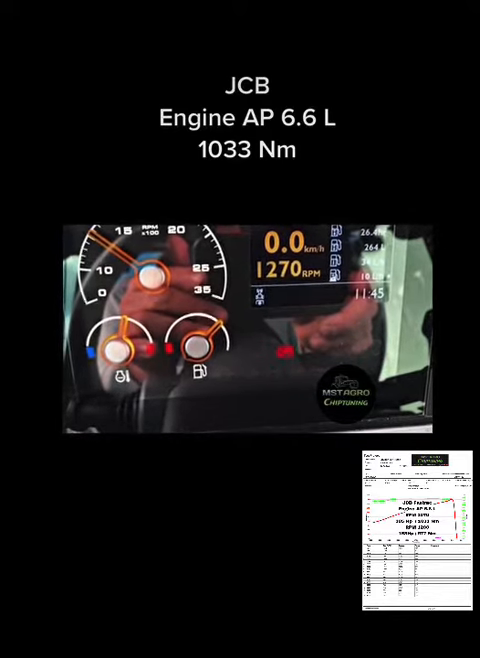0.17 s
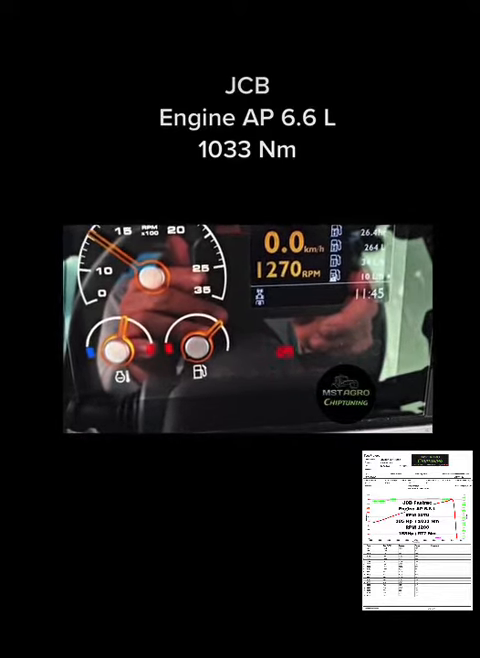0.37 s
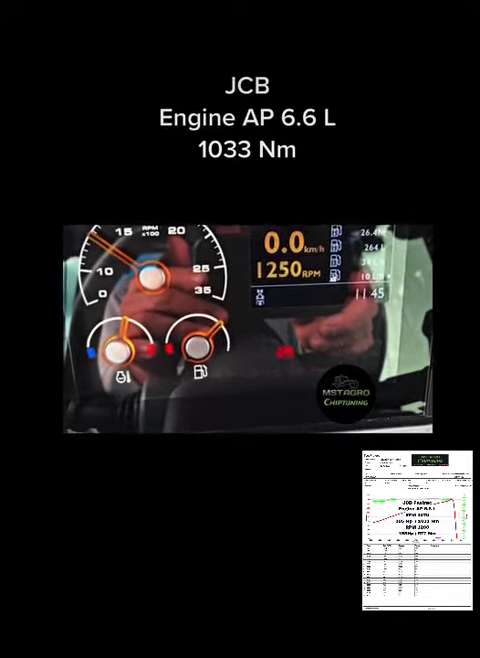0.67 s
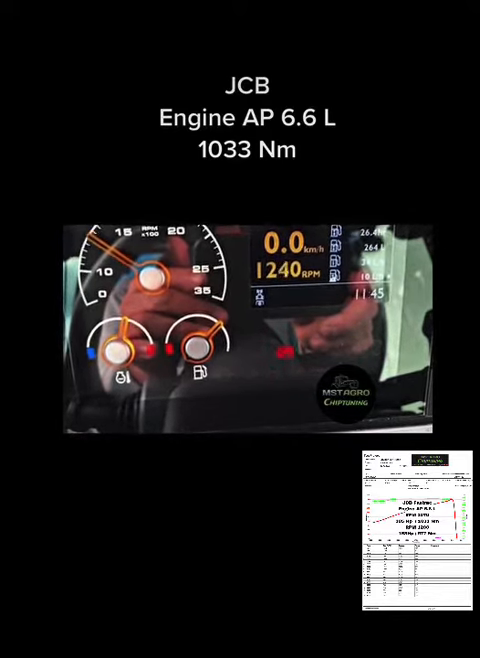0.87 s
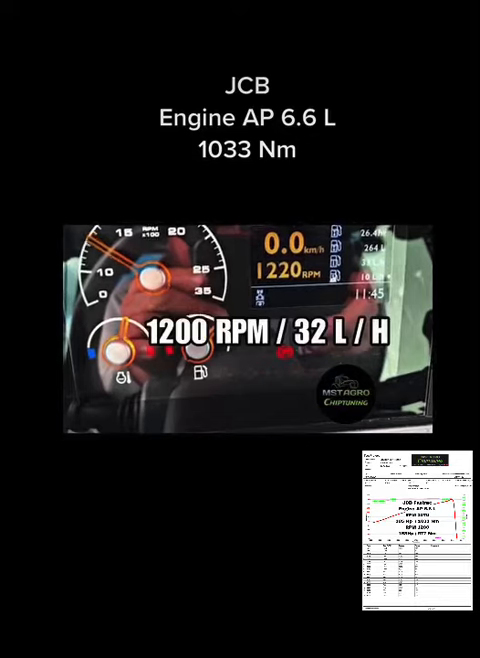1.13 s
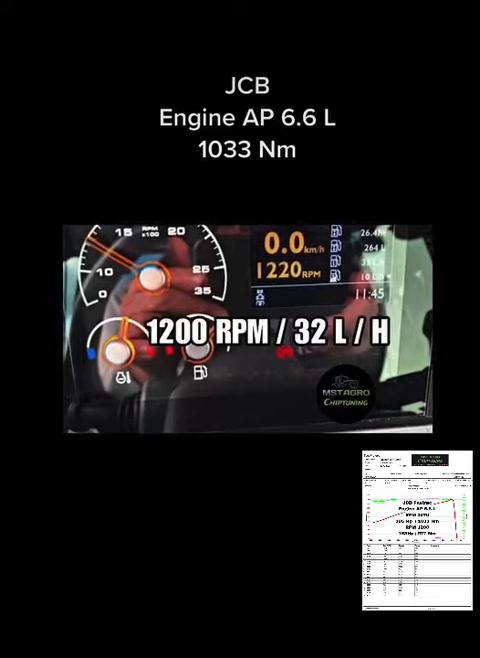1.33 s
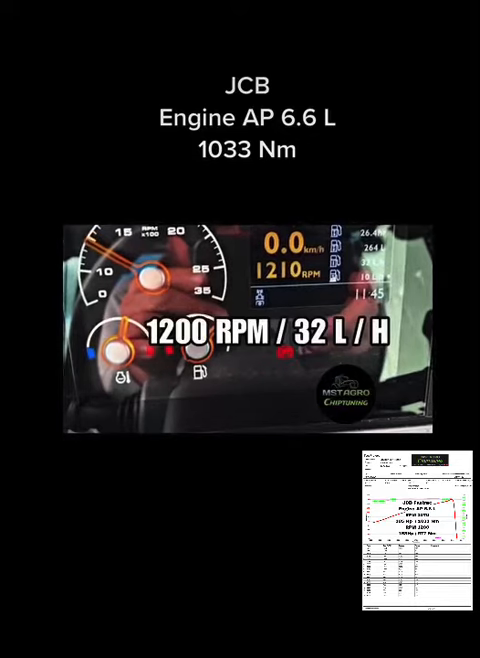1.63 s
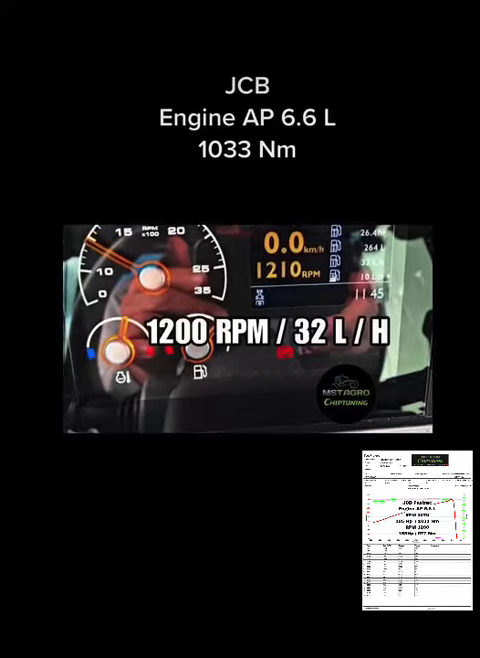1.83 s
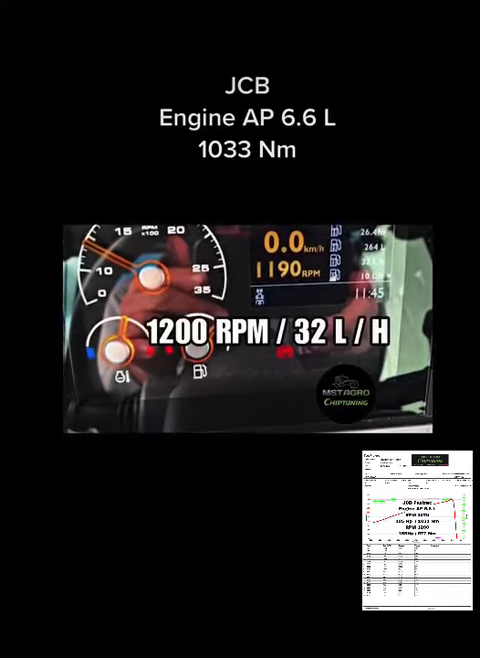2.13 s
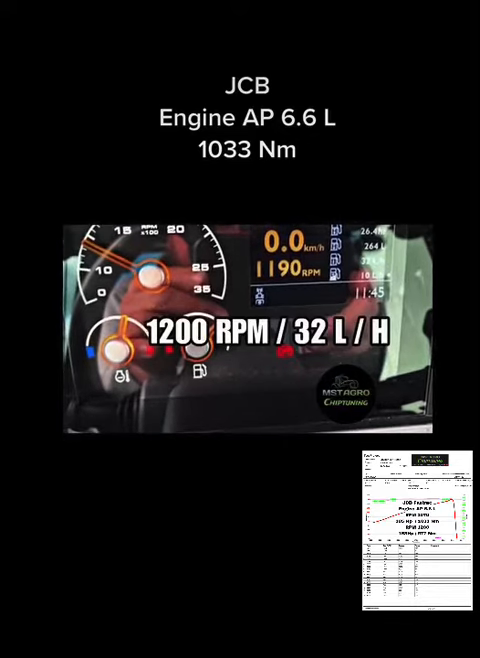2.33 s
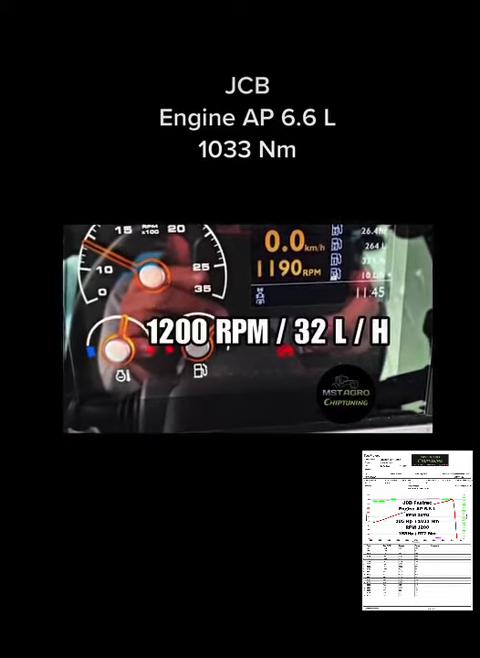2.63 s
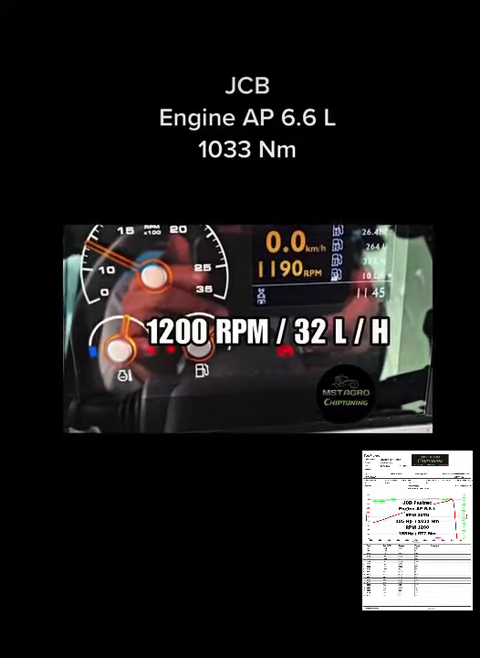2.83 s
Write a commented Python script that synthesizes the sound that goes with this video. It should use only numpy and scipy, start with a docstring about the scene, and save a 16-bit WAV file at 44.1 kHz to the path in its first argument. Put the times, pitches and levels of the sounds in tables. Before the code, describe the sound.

Diesel tractor engine droning under load inside the cab, sagging slightly in pitch, then recovering

```python
"""Inside a tractor cab: a load pulls the six-cylinder diesel down, and it recovers at the end. The firing drone
and its orders are sines lifted by cab resonances; a gear pair whines on the same cycle. The cab cavity booms,
filtered noise makes rumble and rushing air, and loose parts rattle in noise bursts. The turbocharger whistles
very high in a thin noise band, and a part rings at the end. Two close microphone ports, alike to a degree that
varies with frequency, pick it up. The top treble is full of gaps: thin strips of hiss come and go."""
import sys
import numpy as np
from scipy import signal
from scipy.fft import rfft, irfft
from scipy.io import wavfile

SR = 44100
rng = np.random.default_rng(int(sys.argv[2]) if len(sys.argv) > 2 else 0)


def file_out(sig):
    """Save sig as 16-bit WAV at sys.argv[1]."""
    # one column per channel
    cols = np.atleast_2d(sig).T
    # limit, then scale
    lim = np.clip(cols, -1, 1)
    pcm = np.round(lim * 32767).astype(np.int16)
    wavfile.write(sys.argv[1], SR, pcm)


def field_ratio(decibels):
    """Amplitude ratio for a level in dB (20 dB per decade); scalars and array-likes work."""
    return 10 ** (np.asarray(decibels, dtype=float) / 20)


N = 132300
HZ = np.maximum(np.fft.rfftfreq(N, 1 / SR), 1)
SIDE = np.array([[.5], [-.5]])   # splits a left-right difference over the left and right port
CYLINDERS = 6   # firings per four-stroke cycle


def rms_one(x):
    """Scales a signal to an rms of 1."""
    return x / np.sqrt(np.mean(x ** 2) + 1e-20)


def in_time(rows):
    """Draws each column of a table as a curve over the scene."""
    seconds, *columns = np.transpose(rows)
    return [np.interp(np.arange(N) / SR, seconds, column) for column in columns]


def at_hz(points, hz):
    """Reads a table along a logarithmic frequency axis."""
    table_hz, values = np.array(points)[:, 0], np.array(points)[:, 1]
    return np.interp(np.log(hz), np.log(np.maximum(table_hz, 1)), values)


def drift(rate_hz):
    """Slow chance with spread 1: white noise through two equal low-pass poles, run at every 40th sample."""
    r = np.exp(-80 * np.pi * rate_hz / SR)
    white = rng.standard_normal(N // 40 + 2002)
    slow = signal.lfilter([1], [1, -2 * r, r * r], white)[2000:]
    return np.interp(np.arange(N) / 40, np.arange(len(slow)), rms_one(slow - slow.mean()))


def resonance(x, hz, width_hz):
    """A two-pole resonator: one damped mode of a cavity or a part."""
    r = np.exp(-np.pi * width_hz / SR)
    poles = [1, -2 * r * np.cos(2 * np.pi * hz / SR), r * r]
    return signal.lfilter([(1 - r * r) / 2, 0, (r * r - 1) / 2], poles, x)


# share of noise power common to both microphone ports: (frequency [Hz], likeness [0-1])
PORT_LIKENESS = [(150, .93), (300, .75), (600, .55), (2000, .45), (4000, .5), (6000, .8), (11000, .85)]
# phase by which the left port leads in the shared noise: (frequency [Hz], lead [rad])
PORT_LEAD = [(0, 0.3), (600, 1.26), (1120, 2.33), (1810, 3.03), (3360, 10.27), (5860, 19.15), (8000, 19)]
# level of the left port over the right: (frequency [Hz], level difference [dB])
PORT_BALANCE = [(60, -4), (150, -0.5), (380, 3.5), (950, 1.5), (2380, 0.5), (5980, -0.5), (15000, -7.5)]


def port_noise():
    """Spectrum of white noise at both ports: a shared part with lead, a part of each port's own, and balance."""
    shared, left, right = rfft(rng.standard_normal((3, N)))
    alike = np.clip(at_hz(PORT_LIKENESS, HZ), 0, 1)
    lead = np.interp(HZ, *np.transpose(PORT_LEAD))
    common = np.sqrt(alike) * shared * np.exp(1j * SIDE * lead)
    own = np.sqrt(1 - alike) * np.array([left, right])
    hiss_band = HZ < 11150   # top of the steady hiss, Hz
    return (common + own) * field_ratio(SIDE * at_hz(PORT_BALANCE, HZ)) * hiss_band


def coloured(spectrum, patchy_db):
    """Noise of a given colour; every half octave flickers partly with the others, mostly alone."""
    noise = port_noise() * field_ratio(at_hz(spectrum, HZ))
    together, out = drift(3.4), 0
    top = max(db for _, db in spectrum)
    for centre in np.arange(4.5, 14.5, .5):   # octaves above 1 Hz
        if at_hz(spectrum, 2 ** centre) > top - 50:
            window = np.cos(np.pi * np.clip(np.log2(HZ) - centre, -.5, .5)) ** 2
            flicker_db = patchy_db * (0.12 * together + drift(38.0))
            out = out + field_ratio(flicker_db) * irfft(noise * window, N)
    return rms_one(out)


def narrow_noise(hz, width_hz, lead):
    """A narrow band of noise carried on a pitch, with its phase leading at the left port by lead [rad]."""
    low_pass = signal.butter(4, width_hz / 2, fs=SR, output="sos")
    a, b = signal.sosfilt(low_pass, rng.standard_normal((2, N)))
    phase = 2 * np.pi * np.cumsum(hz * np.ones(N)) / SR + lead * SIDE
    return rms_one(a * np.cos(phase) + b * np.sin(phase))


DRONE_WAVER_DB, WAVER_RATE_HZ = .35, 9.0
DRONE_PAN_DB_PER_HZ = -0.6   # left over right, per Hz of firing tone above its mean
PHASE_WANDER_RAD, PHASE_LEAD_RAD = .7, 1.2   # all tones but the firing tone
# cab panel resonances that lift tones passing through: (frequency [Hz], width [Hz], lift [dB])
CAB_RESONANCES = [(125, 12, 9), (244.5, 11, 16), (293, 20.4, 6.5), (1925, 110, 10), (2480, 70, 10)]


def tones(table, cycle_hz, waver_db, wander_hz=1.5):
    """Sines on whole multiples of the engine cycle, each wavering and lifted near a cab resonance."""
    turn, out = 2 * np.pi * np.cumsum(cycle_hz) / SR, np.zeros((2, N))
    for multiple, db, pan_db, lead in table:
        multiple = round(multiple)
        tone_hz = multiple * cycle_hz
        lift = sum(lift_db / (1 + (2 * (tone_hz - hz) / width) ** 4) for hz, width, lift_db in CAB_RESONANCES)
        waver = (DRONE_WAVER_DB if multiple == CYLINDERS else waver_db) * drift(WAVER_RATE_HZ)
        # the octave keeps near a set phase offset from the firing tone, other tones start anywhere
        free_start = multiple not in (CYLINDERS, 2 * CYLINDERS)
        phase = multiple * turn + rng.uniform(0, 2 * np.pi) * free_start
        if multiple == CYLINDERS:
            pan_db = pan_db + DRONE_PAN_DB_PER_HZ * (tone_hz - tone_hz.mean())
        else:
            phase = phase + PHASE_LEAD_RAD + PHASE_WANDER_RAD * drift(wander_hz)
        level = field_ratio(db + lift + waver + SIDE * pan_db)
        out += np.sqrt(2) * level * np.cos(phase + SIDE * lead)
    return out


# engine orders, before cab lift and engine gain:
# (multiple of the cycle rate, level [dB rms], left over right [dB], left lead [rad])
ENGINE_ORDERS = [(4, -49.5, -10, -1.4), (6, -27.5, -2.5, -0.33), (9, -64.5, -21, 0.82),
                 (12, -47, 1.5, -0.04), (15, -57.5, 15, -0.1), (18, -52, 2, 0.18), (24, -60, -3, 0.14),
                 (27, -50.5, -2, 0.48), (28, -53.5, -12.5, 0.051), (30, -51.5, -6.5, 0.92),
                 (42, -58, 11.5, 0.24)]


def drone(cycle_hz, gain_db):
    """Firing pulses repeat every engine cycle, so the drone is a row of tones on its multiples."""
    return field_ratio(gain_db) * tones(ENGINE_ORDERS, cycle_hz, waver_db=1.8)


# gear mesh, its overtones, and rough overtones free of the engine gain; multiples are rounded when played:
# (multiple of the cycle rate, level before lift and gain [dB rms], left over right [dB], left lead [rad])
MESH_TONES = [(62, -45.5, 1.4, -0.14)]
MESH_OVERTONES = [(123.5, -47.5, 1, 1.95)]
ROUGH_MESH_OVERTONES = [(186, -64.5, 1.5, 4), (248, -72, -4, 5.6)]


def gears(cycle_hz, mesh_db, overtone_db):
    """Meshing teeth whine in step with the engine; the rough overtones wander fast in phase."""
    mesh = field_ratio(mesh_db) * tones(MESH_TONES, cycle_hz, waver_db=1.2)
    overtones = field_ratio(overtone_db) * tones(MESH_OVERTONES, cycle_hz, waver_db=1.2)
    rough = tones(ROUGH_MESH_OVERTONES, cycle_hz, waver_db=2.2, wander_hz=22.0)
    return mesh + overtones + rough


def boom():
    """The cab cavity is shaken at random and hums around one pitch."""
    hz, width_hz, level_db = 120, 20, -39
    shaken = resonance(irfft(port_noise(), N), hz, width_hz)
    return field_ratio(level_db) * rms_one(resonance(shaken, hz, 2 * width_hz))


# colour of the low cab noise: (frequency [Hz], relative density [dB per Hz])
RUMBLE_COLOUR = [(28, -32), (45, -10.5), (130, -16), (205, -17), (260, -7.5), (310, -14.5), (355, -17.5),
                 (440, -12.5), (640, -12), (760, -15), (850, -20), (1110, -21), (1400, -24), (2100, -28.5),
                 (5400, -39)]


def rumble():
    """Broad low noise in the cab, uneven from band to band."""
    return field_ratio(-36.5) * coloured(RUMBLE_COLOUR, patchy_db=2)


# resonances of the rattling parts: (frequency [Hz], relative level [dB], width [Hz])
RATTLE_RESONANCES = [(2355, -5.5, 40), (3174, -5, 104), (4310, -10.5, 93)]


def rattle(firing_hz):
    """Loose parts rattle in uneven bursts at random moments, on average as often as the firings."""
    level_db, decay_s, spread_db, steady, waver_db = -56.5, .0025, 3.0, .35, .4
    noise, out = irfft(port_noise(), N), 0
    fade = np.exp(-1 / (decay_s * SR))
    for hz, db, width in RATTLE_RESONANCES:
        struck = rng.random(N) < firing_hz / SR
        blows = struck * field_ratio(spread_db * rng.standard_normal(N))
        burst = signal.lfilter([1], [1, -fade], blows) + steady
        part = rms_one(resonance(noise * burst, hz, width))
        out = out + field_ratio(db + waver_db * drift(2.5)) * part
    return field_ratio(level_db) * rms_one(out)


# colour of the air rush: (frequency [Hz], relative density [dB per Hz])
AIR_COLOUR = [(3800, -6), (4900, 10), (6400, -34), (6950, 11), (7500, -12.5), (8200, 12.5), (9000, -0.5),
              (11100, 0.5)]


def air(flow_db):
    """Turbulent air rushes as coloured noise that swells with the flow."""
    return field_ratio(-53 + flow_db) * coloured(AIR_COLOUR, patchy_db=1.5)


# turbocharger whistle: (time [s], pitch [Hz], level before flicker [dB])
TURBO_WHISTLE = [(1.1, 11680, -95), (1.4, 11600, -60), (2, 11460, -58), (2.6, 11390, -59), (3, 11520, -58)]
WHISTLE_LEAD_RAD = 0.3   # left before right


def turbo():
    """A thin breathy whistle on the blade rate, sinking under load and rising as the engine recovers."""
    hz, db = in_time(TURBO_WHISTLE)
    flicker_db = 2.0 * drift(39.0)
    return field_ratio(db + flicker_db) * narrow_noise(hz, 70, WHISTLE_LEAD_RAD)


def ring():
    """A part rings briefly as the load lets go: a narrow metallic whine, slightly unsteady in pitch."""
    start_s, length_s, pitch_hz, pitch_spread_hz, level_db = 2.85, .15, 4270, 6, -59
    age = (np.arange(N) / SR - start_s) / length_s
    envelope = np.clip(8 * np.minimum(age, 1 - age), 0, 1)   # fades over an eighth at either end
    turn = 2 * np.pi * np.cumsum(pitch_hz + pitch_spread_hz * drift(35.0)) / SR
    return field_ratio(level_db) * envelope * np.sqrt(2) * np.sin(turn)


# strips of the top treble: (centre [Hz], level outside the gaps [dB]; the lowest also yields to the whistle)
TREBLE_STRIPS = [(11320, -54), (12600, -61), (13200, -68), (13700, -67), (14300, -66)]
# how much of the time the strips are present, higher for fewer gaps: (time [s], offset [spreads of chance])
STRIP_PRESENCE = [(.28, .9), (.4, -1.4), (.72, -.8), (1.2, .4)]


def gappy_treble():
    """The top treble is full of gaps, with no source in the cab: noise strips drop out and return
    independently."""
    out = np.zeros((2, N))
    presence, = in_time(STRIP_PRESENCE)
    _, whistle_db = in_time(TURBO_WHISTLE)
    for k, (hz, db) in enumerate(TREBLE_STRIPS):
        lowest = k == 0   # has fewer gaps
        shortfall = np.minimum(drift(9.0) + presence + lowest, 0)
        gain = field_ratio(db + 60.0 * shortfall)   # 60 dB down per spread of chance
        if lowest:
            gain = gain * field_ratio(-.2 * (whistle_db - whistle_db[0]))   # yields to the whistle
        out += gain * narrow_noise(hz, 240, WHISTLE_LEAD_RAD if lowest else 1.35)
    return out


# engine speed before jitter: (time [s], firing rate [firings per s])
ENGINE_SPEED = [(0, 63.7), (.45, 62.9), (.8, 61.6), (1.15, 60.75), (1.6, 60.0), (2.1, 59.45), (2.62, 59.1),
                (2.76, 59.9), (2.86, 61.3), (3.0, 64.6)]
# gains on the engine's layers:
# (time [s], drone [dB], gear mesh [dB], mesh overtones [dB], air flow [dB])
ENGINE_GAINS = [(0, 2, -9, -1.5, 1), (.4, -0.5, -11, -0.5, -1.5), (.6, 0.5, 3.5, -6.5, 0.5),
                (.85, 1.5, -5.5, 4, 0), (1.15, 1, 1.5, 5, -0.5), (1.7, 1.3, 4, 2.5, -2),
                (2.1, 1.6, 4, -1.5, -2), (2.45, 2.5, 4, -7.5, -2.5), (2.76, 2, 2.5, 4.5, 2.5),
                (2.87, -0.5, -9, -2, 1), (3.0, -2, -3, 1, 3)]


def scene():
    """The cab's sources at the two ports, with the gappy top treble added."""
    firing_hz, = in_time(ENGINE_SPEED)
    drone_db, mesh_db, overtone_db, flow_db = in_time(ENGINE_GAINS)
    speed_jitter = 0.00086 * drift(18.4)   # share of the speed
    cycle_hz = firing_hz / CYLINDERS * (1 + speed_jitter)
    engine = drone(cycle_hz, drone_db) + gears(cycle_hz, mesh_db, overtone_db)
    cab = boom() + rumble() + rattle(firing_hz)
    return engine + cab + air(flow_db) + turbo() + ring() + gappy_treble()


def top_cut(x):
    """Nothing passes above the cut-off."""
    return signal.sosfilt(signal.butter(12, 15670, fs=SR, output="sos"), x)


def record(dry):
    """The recorder takes the finished mix of both ports."""
    return top_cut(dry)


dry = scene()
out = record(dry)
file_out(out)
```